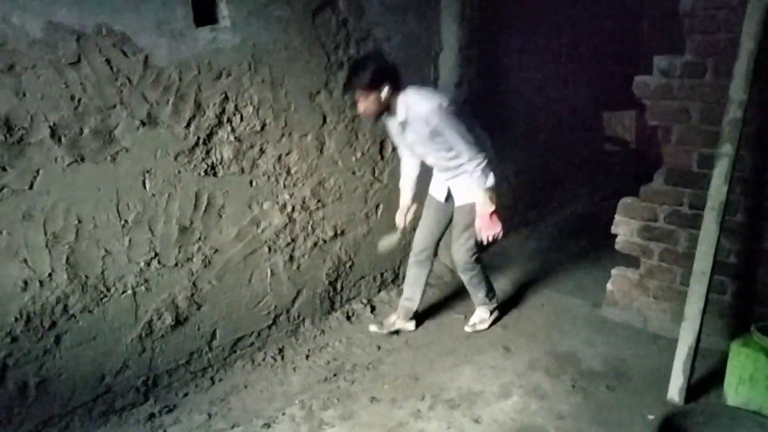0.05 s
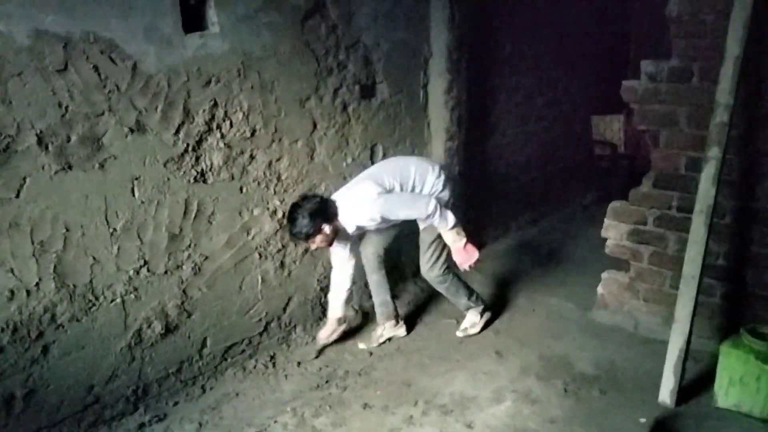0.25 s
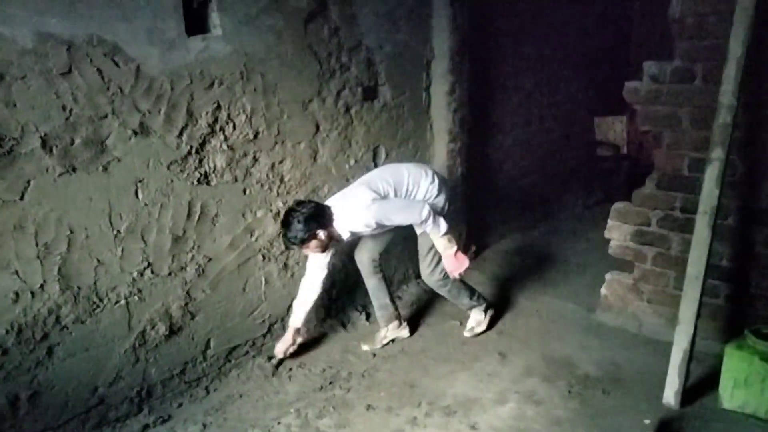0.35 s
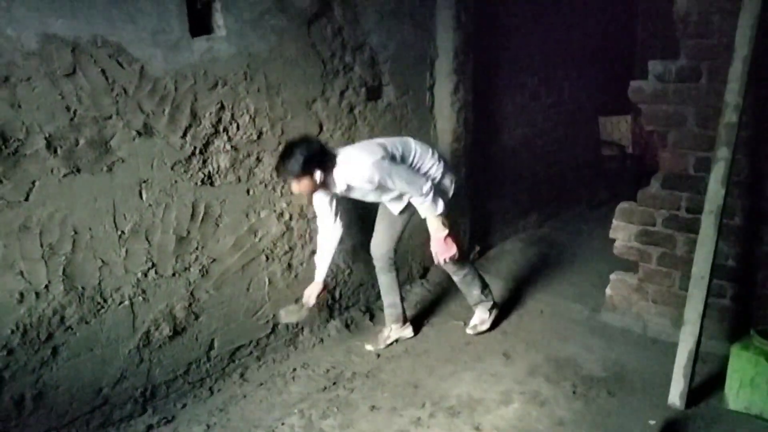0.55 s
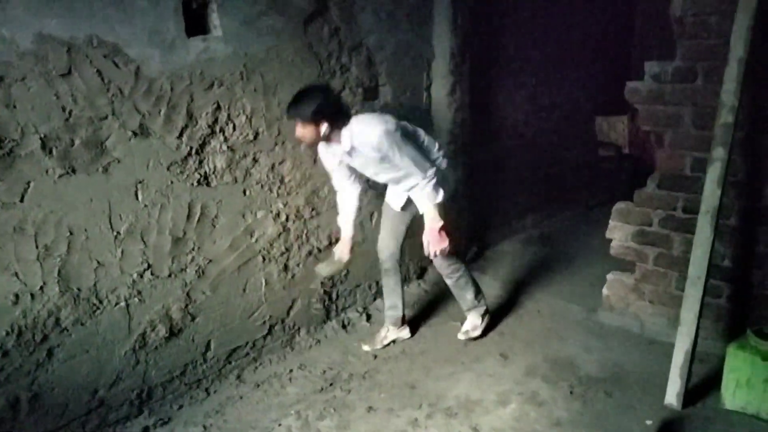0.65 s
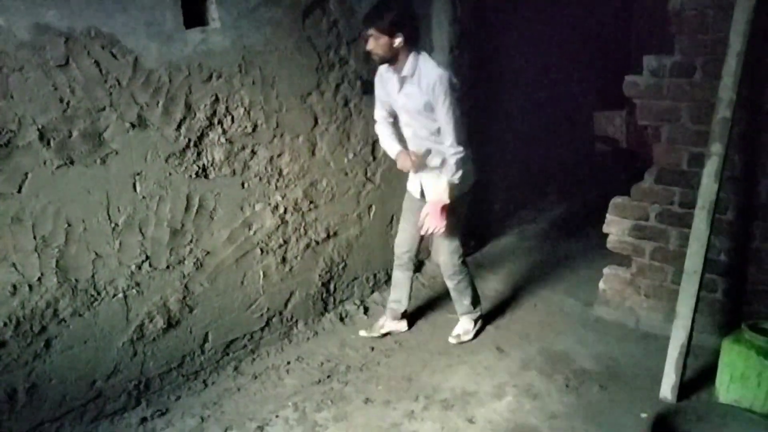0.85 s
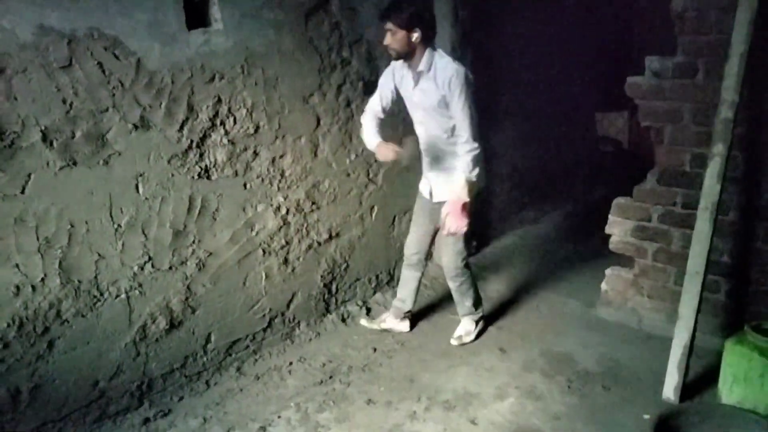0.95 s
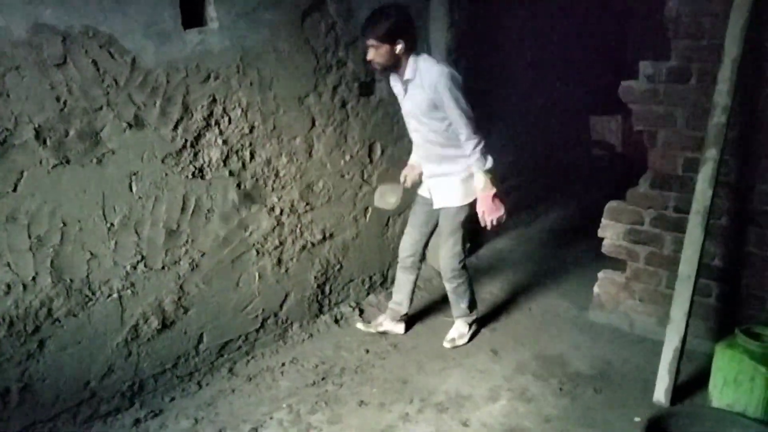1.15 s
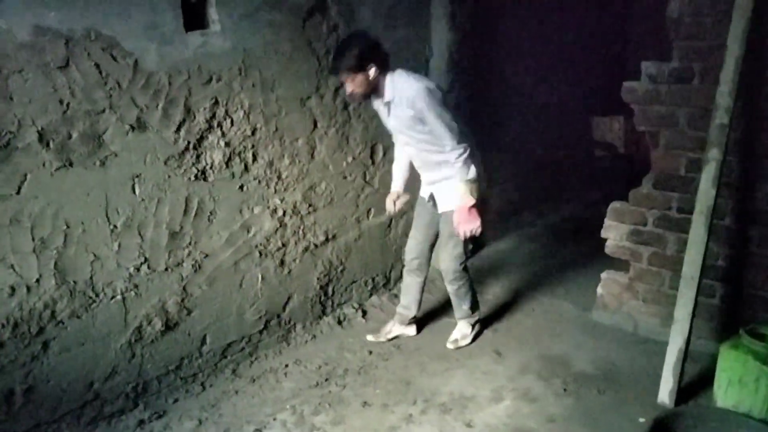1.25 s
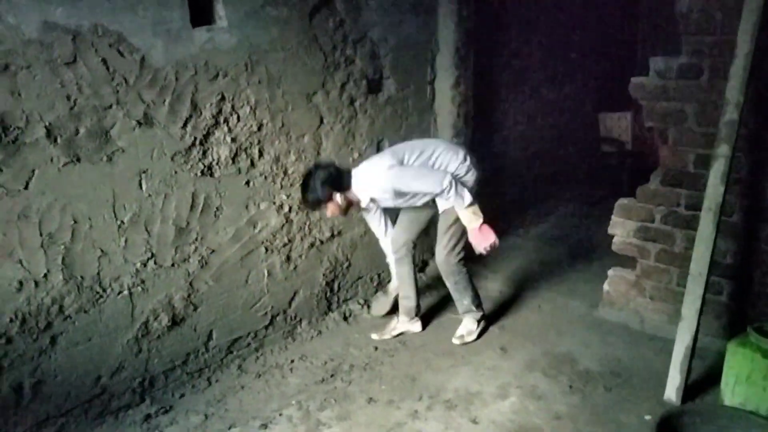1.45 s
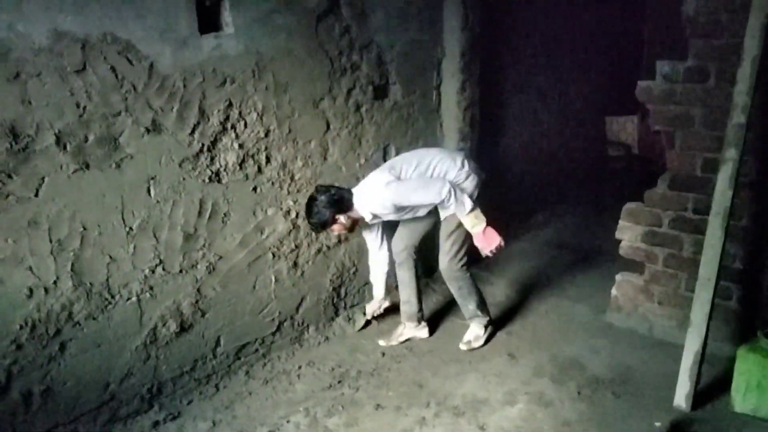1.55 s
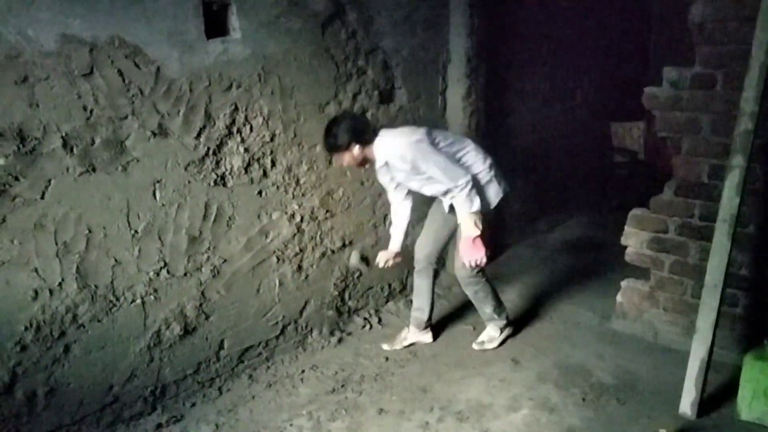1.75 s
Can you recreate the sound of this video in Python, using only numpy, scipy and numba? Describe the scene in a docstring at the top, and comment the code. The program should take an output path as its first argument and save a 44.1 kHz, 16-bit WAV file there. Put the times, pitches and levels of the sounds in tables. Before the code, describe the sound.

Gritty trowel scrapes on a concrete floor, with one wet mortar slap in a bare room.

```python
"""A steel trowel scrapes mortar off a concrete floor as a plasterer works in a bare brick room.
Sand grains grind under the blade and make it ring. The wet load is flung at the wall: it slaps,
the room booms and crumbs patter down, then the trowel scoops again. Clothes and sandals rustle
between strokes. The scene opens on the dying boom of an earlier throw, over a faint steady hiss."""
import sys
import numpy as np
from scipy import signal
from scipy.fft import rfft, irfft
from scipy.io import wavfile
from numba import njit

SR = 44100
rng = np.random.default_rng(int(sys.argv[2]) if len(sys.argv) > 2 else 0)


def bounce(signal):
    """Save signal as a 16-bit WAV file at the path given by the first command-line argument."""
    frames = np.transpose(np.atleast_2d(signal))
    limited = np.clip(frames, -1, 1)
    pcm = np.round(limited * 32767).astype(np.int16)
    wavfile.write(sys.argv[1], SR, pcm)


N = 79380


def undb(db):
    """Turn decibels into a gain to multiply by."""
    return 10 ** (np.asarray(db) / 20)


def clock():
    """Time of each sample in seconds."""
    return np.arange(N) / SR


def unit(x):
    """Scale a sound to an average power of 1."""
    return x / np.sqrt(np.mean(x ** 2) + 1e-20)


def through(x, response):
    """Pass a sound through something that answers a single click with this response."""
    return signal.fftconvolve(x, response)[:N]


def on_log_axis(hz, points):
    """Read between (Hz, value) points, giving every octave equal room."""
    freqs, values = np.array(points, float).T
    return np.interp(np.log(np.maximum(hz, 1)), np.log(freqs), values)


def colour(x, points, size=4096):
    """Give a sound the tone colour drawn by (Hz, dB) points, at power 1."""
    gains = undb(on_log_axis(np.fft.rfftfreq(size, 1 / SR), points))
    cepstrum = irfft(np.log(gains))
    # folding this in half makes the filter ring only after a click, never before it
    cepstrum[1:size // 2] *= 2
    cepstrum[size // 2 + 1:] = 0
    response = irfft(np.exp(rfft(cepstrum)))
    return unit(through(x, response))


def fade(t, t60):
    """Fall by 60 dB in t60 seconds."""
    return np.exp(-np.log(1000) * np.maximum(t, 0) / t60)


def envelope(start, attack, hold, release):
    """Rise smoothly, hold, then fall by 20 dB in each release time."""
    t = clock() - start
    rise = np.sin(np.pi / 2 * np.clip(t / attack, 0, 1)) ** 2
    return rise * 10 ** (-np.maximum(t - attack - hold, 0) / release)


def modes(table, t):
    """The fading pure tones of an object struck at t = 0."""
    return sum(undb(db) * np.sin(2 * np.pi * hz * np.maximum(t, 0)) * fade(t, t60)
               for hz, db, t60 in table)


def ring(x, table):
    """Let a sound set an object's tones ringing, at about the same power."""
    return through(x, unit(modes(table, clock())) / np.sqrt(N))


def grains(per_s, spread_db):
    """Tiny random clicks of uneven size."""
    hits = rng.random(N) < per_s / SR
    signs = rng.choice([-1, 1], N)
    sizes = undb(spread_db * np.clip(rng.standard_normal(N), -2, 2))
    return unit(hits * signs * sizes)


def judder(per_s, depth_db):
    """A gain that jumps about as surfaces catch and slip."""
    wobble = np.interp(clock() * per_s, np.arange(N), rng.uniform(-2, 2, N))
    return unit(undb(depth_db * wobble))


@njit
def resonate(x, hz, width):
    """Let through only the sound near a pitch, which may move."""
    y = np.empty(len(x))
    mid_state, low_state = 0., 0.
    for i in range(len(x)):
        step, damping = np.tan(np.pi * hz[i] / SR), width / hz[i]
        mid = (mid_state + step * (x[i] - low_state)) / (1 + step * (step + damping))
        mid_state = 2 * mid - mid_state
        low_state += 2 * step * mid
        y[i] = damping * mid
    return y


def band(hz, width):
    """Noise around one steady or gliding pitch, at power 1."""
    centre = hz + np.zeros(N)
    once = resonate(rng.standard_normal(N), centre, float(width))
    return unit(resonate(once, centre, float(width)))


def throws():
    """Wet mortar slaps the wall, the room booms and crumbs fall. Returns (slap and crumbs, boom)."""
    # hits on the wall, the first before the scene begins: t/s, level/dB
    hits = [(-.27, -0.5), (1.061, -1.5)]
    # tone colours of the slap, the falling crumbs and the dull thud: f/Hz, level/dB
    slap_colour = [(130, 3), (300, -5), (520, 6), (720, -4.5), (950, 4), (1500, 4), (2200, 1.5),
                   (3800, 5.5), (5000, -9), (7000, -5.5), (10000, -2.5), (12500, -12.5), (16000, -13)]
    crumb_colour = [(300, -6), (800, -7.5), (1500, -5.5), (2800, 2), (4200, 1), (5100, -8.5), (6500, -7.5),
                    (10000, -15.5), (16000, -29)]
    thud_colour = [(25, 1), (50, -13), (85, 4), (140, -8), (200, -25), (400, -31.5), (2000, -82)]
    # broad tones of the wet load: f/Hz, width/Hz, level/dB
    load_tones = [(533, 49, -7.5), (925, 156, -1), (1120, 110, -25), (2190, 440, -6), (2905, 190, -7.5)]
    # low tones of the boom: f/Hz, level/dB, fade time/s
    boom_tones = [(15.63, -57, 0.43), (20.86, -24.5, 1.56), (39.77, -42.5, 2.24), (55.07, -36.5, 1.57),
                  (65.6, -32, 0.43), (75.2, -24.5, 0.562), (109.3, -41.5, 0.95), (142.6, -33.5, 0.17)]
    boom_rise_s, crumb_delay_s = 0.02, 0.12
    spatter = colour(grains(7000, spread_db=2.5), slap_colour)
    body = sum(undb(db) * band(hz, width) for hz, width, db in load_tones)
    wet_load = undb(-27) * (spatter + undb(-2.5) * body)
    crumbs = undb(-45.5) * colour(grains(2500, spread_db=3), crumb_colour)
    rumble = undb(-45.5) * colour(rng.standard_normal(N), thud_colour)
    splat = boom = 0
    for start, db in hits:
        t = clock() - start
        slap = wet_load * envelope(start, attack=0.005, hold=0.00645, release=0.057)
        patter = crumbs * envelope(start + crumb_delay_s, attack=0.014, hold=0.02, release=0.25)
        hum = modes(boom_tones, t) * np.clip(t / boom_rise_s, 0, 1)
        thud = rumble * envelope(start, boom_rise_s, hold=0, release=0.46)
        splat += undb(db) * (slap + patter)
        boom += undb(db) * (hum + thud)
    return splat, boom


def air():
    """A faint, steady rumble and hiss behind the work."""
    # tone colour of the background: f/Hz, level/dB
    air_colour = [(20, 13.5), (60, 14), (120, 7.5), (300, -2.5), (1000, -8), (3000, 0.5), (4300, -4),
                  (5200, -9), (10000, -12.5), (16000, -21)]
    return undb(-64) * colour(rng.standard_normal(N), air_colour)


def rustles():
    """Cloth and soles brush softly as the worker bends and turns."""
    # movements: t/s, attack/s, hold/s, release/s, swish/dB, fizz/dB, scuff/dB
    moves = [(0.018, 0.04, 0.016, 0.047, -52.5, -49.5, -55),
             (0.101, 0.027, 0.0056, 0.26, -51.5, -58.5, -58.5), (0.53, 0.066, 0.05, .09, -63, -68, -102),
             (0.726, 0.016, 0.0062, 0.064, -49.5, -56.5, -64), (0.802, .02, .01, 0.08, -63.5, -74, -85),
             (0.839, 0.014, 0.0063, 0.033, -67, -61, -58.5), (0.894, 0.014, .03, 0.055, -63, -89, -63.5),
             (1.029, 0.026, 0.034, .02, -48.5, -53, -61), (1.259, 0.068, 0.022, 0.12, -56.5, -53, -63.5),
             (1.639, 0.019, 0.025, 0.21, -55.5, -61.5, -65.5), (1.734, 0.075, .03, .05, -39, -49.5, -57.5)]
    # tone colours of the bright swish, the high fizz and the low scuff: f/Hz, level/dB
    swish = [(150, -24), (400, -23.5), (1300, -12.5), (2400, 2.5), (3200, 4), (4300, 2), (5100, -7),
             (9000, -10.5), (16000, -47)]
    fizz = [(300, -31), (1500, -26), (4000, -5), (6000, -6.5), (10000, 2), (12500, -4.5), (16000, -9)]
    scuff = [(90, -2), (170, -6), (300, -5), (450, -3), (700, -2), (1100, -4.5), (1700, 0), (2600, -5.5),
             (5000, -29), (16000, -50.5)]
    gains = sum(undb(levels)[:, None] * envelope(start, attack, hold, release)
                for start, attack, hold, release, *levels in moves)
    grip = judder(120, depth_db=1.5)
    return grip * sum(gain * colour(grains(7000, spread_db=4), tone)
                      for gain, tone in zip(gains, (swish, fizz, scuff)))


def scoops():
    """The blade grinds over sand, rings, and pushes up mortar that fills the hollow under it."""
    # strokes: t/s, attack/s, hold/s, release/s, edge/dB, hiss/dB, mortar/dB, hollow/dB, ring/dB
    strokes = [(0.209, 0.031, 0.026, 0.023, -25.5, -29.5, -44, -33.5, -36.5),
               (.254, 0.033, 0.027, 0.072, -19, -22.5, -39, -26.5, -29.5),
               (0.312, 0.022, .044, 0.063, -28.5, -29.5, -25, -32, -36.5),
               (1.468, 0.039, 0.016, 0.031, -31, -32, -44.5, -39, -40),
               (1.509, 0.026, 0.025, 0.058, -36, -36.5, -34.5, -48, -47)]
    # tone colours of the blade's edge, the hissing sand and the pushed mortar: f/Hz, level/dB
    edge_colour = [(90, -30), (155, -15.5), (220, -41), (320, -33), (450, -20), (900, -17), (1200, -2.5),
                   (1550, -6.5), (1900, -2.5), (3100, 0.5), (4200, 1), (5000, -13), (8000, -22.5),
                   (16000, -60)]
    hiss_colour = [(300, -45), (1500, -35), (3500, 5), (4600, 0.5), (5500, 2), (7500, 0.5), (10500, 0.5),
                   (12500, -7), (16000, -10.5)]
    mortar_colour = [(90, -31), (145, -11), (200, -36), (260, -9.5), (330, -14), (430, -5.5), (700, -2.5),
                     (900, -1.5), (1200, -2), (1800, -1), (2600, 0.5), (4200, 0), (6000, -16.5),
                     (16000, -51)]
    # pitch of the hollow, falling in each scoop as it fills: t/s, f/Hz
    hollow_pitch = [(.225, 1694), (.315, 1470), (.361, 1310), (.41, 1170), (1.491, 1446), (1.55, 1065)]
    # tones of the steel blade: f/Hz, level/dB, fade time/s
    blade_tones = [(675.7, -3.5, 0.31), (1220, -7, 0.12), (1334, -8.5, 0.17), (1494, -7, 0.18),
                   (1486, -6, 0.19), (1602, 3.5, 0.27), (2179, 10.5, 0.21), (2367, -8, 0.137),
                   (2772, -6, 0.2), (3025, 8.5, 0.18), (3370, 7.5, 0.22), (3380, -4, 0.14),
                   (3520, -5, 0.084), (3690, -9, 0.11)]
    release_shares = np.array([1, 0.63, 1, 1, 1])[:, None]  # the hiss stops first as the blade lifts
    grip = judder(260, depth_db=1.5)
    gains = sum(undb(levels)[:, None] * envelope(start, attack, hold, release * release_shares)
                for start, attack, hold, release, *levels in strokes)
    edge_gain, hiss_gain, mortar_gain, hollow_gain, ring_gain = grip * gains
    grit = grains(3700, spread_db=0.5)
    edge = edge_gain * colour(grit, edge_colour)
    hiss = hiss_gain * colour(grit, hiss_colour)
    hollow_hz = np.interp(clock(), *np.array(hollow_pitch).T)
    hollow = hollow_gain * band(hollow_hz, width=380)
    blade = ring(ring_gain * grains(6000, spread_db=1.5), blade_tones)
    mortar = mortar_gain * colour(grains(6000, spread_db=2.5), mortar_colour)
    return edge + hiss + mortar + hollow + blade


def knocks():
    """The trowel and feet make short ticks and taps, each around its own pitch."""
    # taps: t/s, level/dB, f/Hz, width/Hz, fade time/s
    taps = [(0.672, -48, 2900, 2010, 0.023), (0.685, -60.5, 2690, 200, 0.14),
            (.891, -49, 1200, 1890, 0.036), (.893, -55, 525, 350, 0.049), (0.924, -59.5, 427, 297, 0.048),
            (1.486, -43.5, 490, 147, 0.11)]
    return sum(undb(db) * band(hz, width) * (clock() >= start) * fade(clock() - start, t60)
               for start, db, hz, width, t60 in taps)


def room(x, bands=9):
    """Bare brick walls add a blur of echoes; each octave dies away at its own speed."""
    # how long the echoes last: f/Hz, fade time/s
    fade_times = [(150, .45), (350, 0.51), (1200, 0.3), (3000, 0.28), (6000, 0.25), (14000, 0.33)]
    # tone colour of the echoes, slightly duller in the treble: f/Hz, level/dB
    echo_colour = [(150, 2), (350, 1), (1200, 0), (3000, 1.5), (5000, -1.5), (9000, -1), (15000, -4)]
    echo_gain, gap_s = undb(-8.5), 0.0039
    hz = np.fft.rfftfreq(N, 1 / SR)
    noise = rfft(rng.standard_normal(N))
    centres = np.geomspace(60, 15000, bands)
    tail = 0
    for centre, share in zip(centres, np.eye(bands)):
        octave = irfft(noise * on_log_axis(hz, list(zip(centres, share))), N)
        decay = fade(clock(), on_log_axis(centre, fade_times))
        tail += octave * decay * undb(on_log_axis(centre, echo_colour))
    onset = np.clip(clock() / gap_s - 1, 0, 1)  # silent until the first echo returns
    tail = unit(tail * onset) / np.sqrt(N)
    return (x + echo_gain * through(x, tail)) / np.hypot(1, echo_gain)


def scene():
    """All the work in one room, the same in both ears."""
    splat, boom = throws()
    mono = room(scoops() + splat + rustles() + knocks()) + boom + air()
    return np.array([mono, mono])


def record(dry):
    """Cut off the very highest treble."""
    top_hz = 15750
    return signal.sosfilt(signal.ellip(10, .1, 80, top_hz, fs=SR, output="sos"), dry)


dry = scene()
out = record(dry)
bounce(out)
```